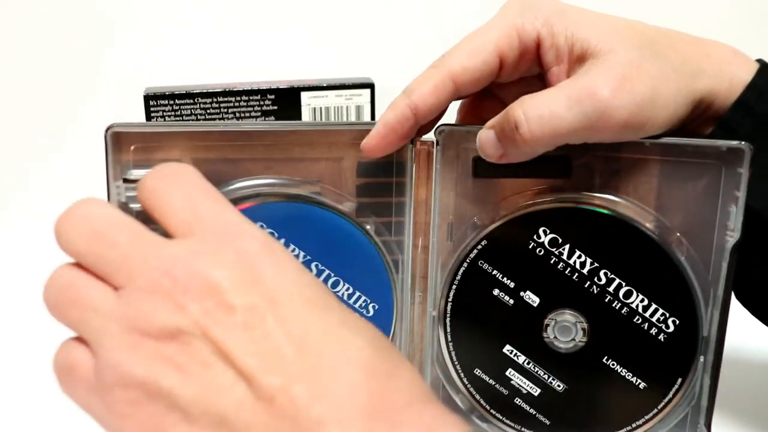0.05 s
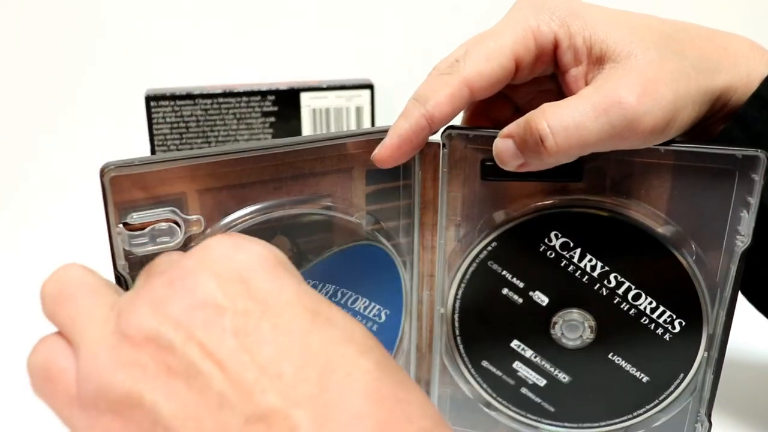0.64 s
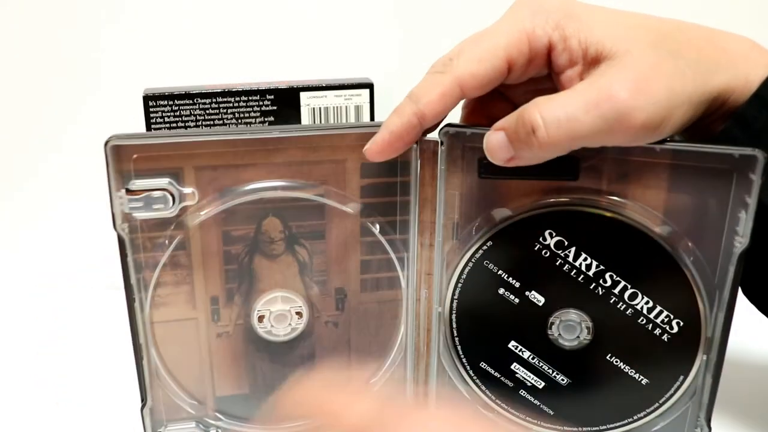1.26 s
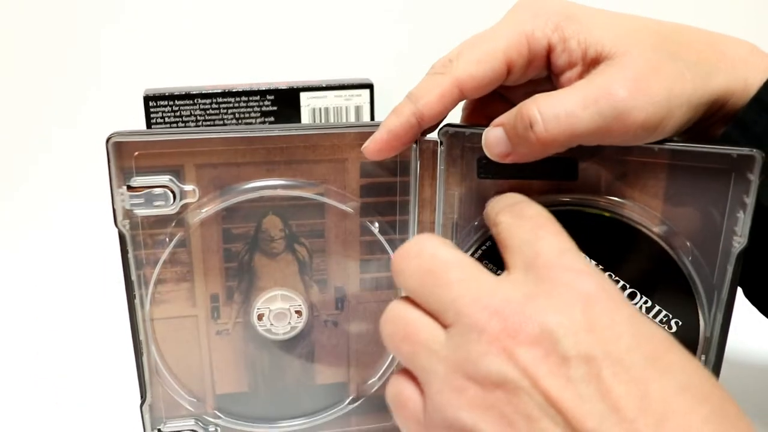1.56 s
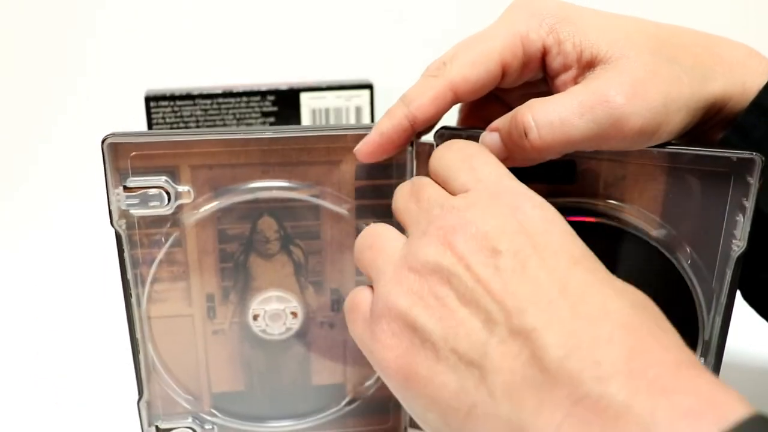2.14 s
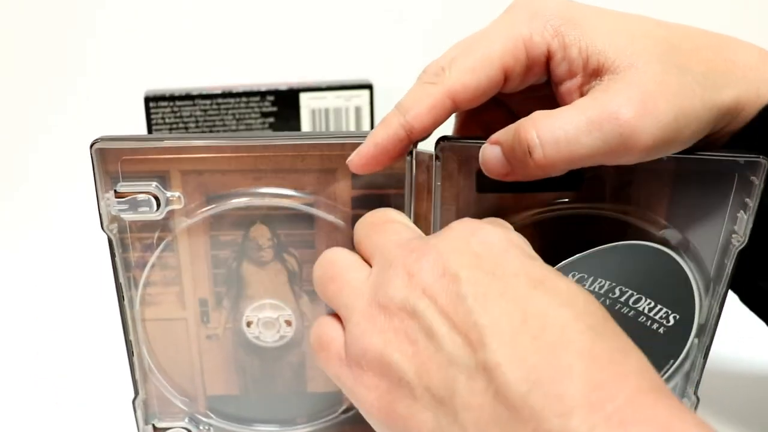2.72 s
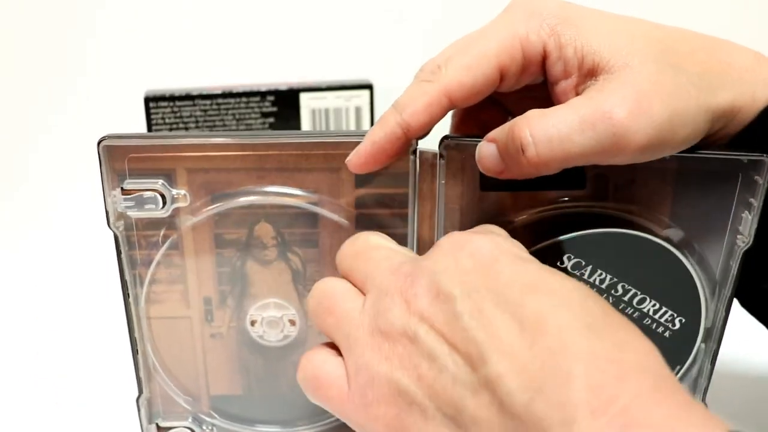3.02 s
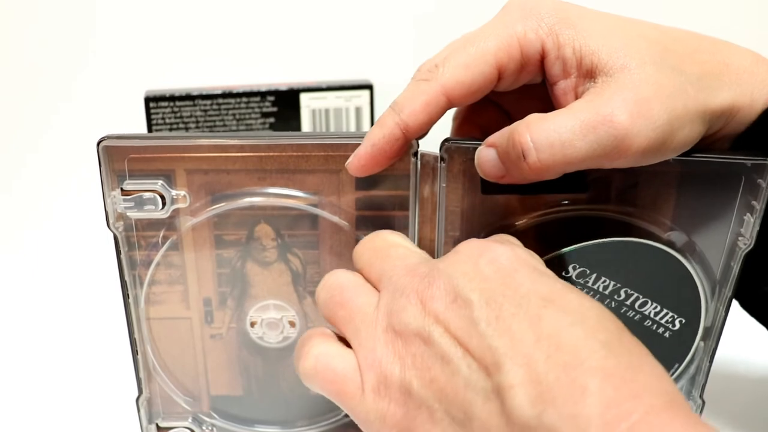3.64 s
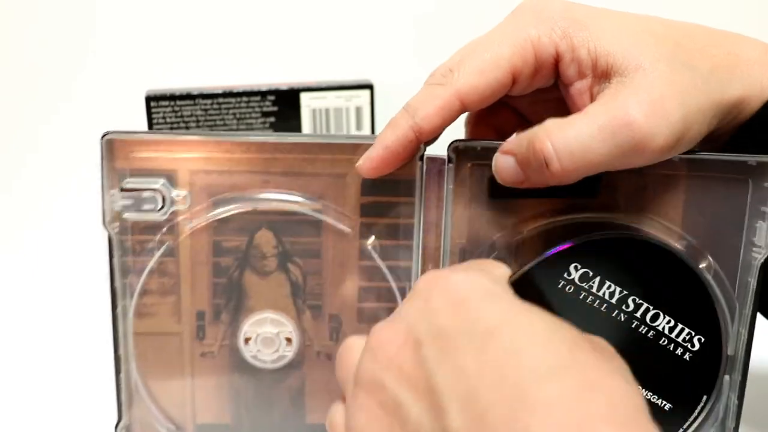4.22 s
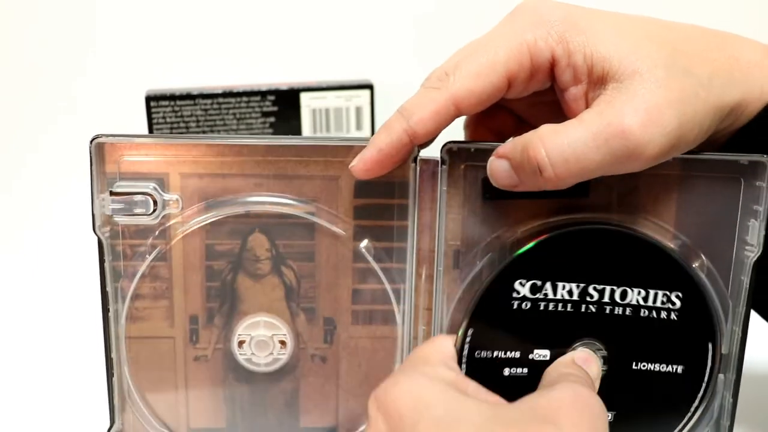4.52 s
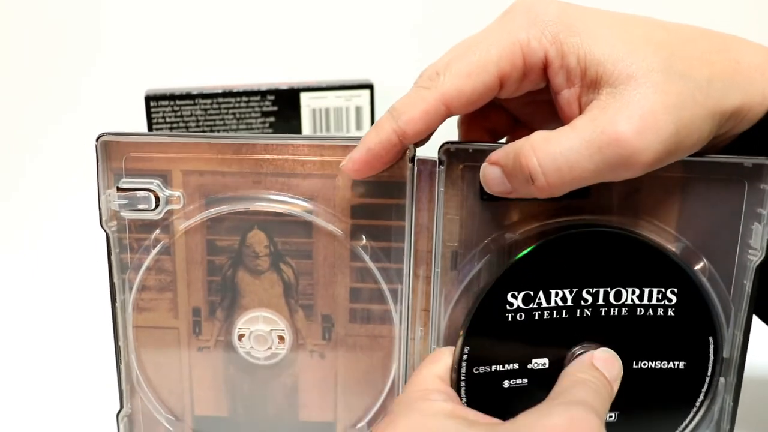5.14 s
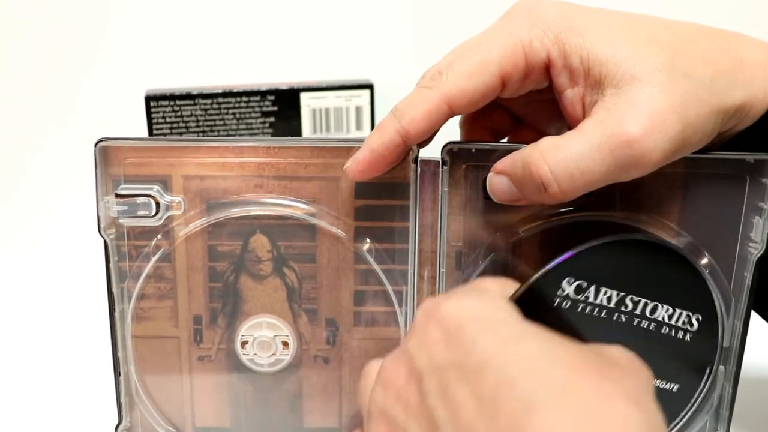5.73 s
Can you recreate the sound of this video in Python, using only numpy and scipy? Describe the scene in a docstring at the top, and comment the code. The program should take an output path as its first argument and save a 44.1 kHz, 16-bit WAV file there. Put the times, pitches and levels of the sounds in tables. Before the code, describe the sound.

Close handling of a plastic disc case: fingers rub and tap, and discs snap loose three times with loud clicks.

```python
"""Discs worked loose from a plastic tray

Close by in a small room, a hub clip lets go three times: each release cracks, the disc rings in its
damped modes and the case thumps, and the loudest peaks overload the recorder. In between, nails and
disc edges tick on the tray, skin and discs slide over it with stick-slip friction, and the case
rumbles as a disc is bent."""
import sys
import numpy as np
from scipy import signal
from scipy.fft import rfft, irfft, next_fast_len
from scipy.io import wavfile
from scipy.ndimage import uniform_filter1d, map_coordinates

SR = 44100
rng = np.random.default_rng(int(sys.argv[2]) if len(sys.argv) > 2 else 0)


def generate_wav(signal):
    """Clip the signal to [-1, 1] and save it as 16-bit WAV at the path in sys.argv[1]."""
    frames = np.transpose(np.atleast_2d(signal))
    scaled = np.clip(frames, -1, 1) * 32767
    pcm = np.round(scaled).astype(np.int16)
    wavfile.write(sys.argv[1], SR, pcm)


N = 258911
AGE = np.arange(8192) / SR  # time since a transient began [s]
HZ = np.fft.rfftfreq(8192, 1 / SR)  # frequencies of its spectrum

# hub releases: (time [s], disc ring [dB], crack [dB], crack t60 [s],
# tray knock [dB], knock frequency [Hz], thump [dB], thump frequency [Hz])
RELEASES = [(0.7571, -2, 1.5, 0.031, -18, 323, -3, 133.2), (3.8661, -2, -0.5, 0.029, -12.5, 396, -1, 140),
            (5.7315, -6.5, -6, 0.015, -18.5, 249, -28, 207)]
# spectrum of the hiss of slipping contacts: (frequency [Hz], level [dB])
HISS_SPECTRUM = [(2500, -37.5), (4200, -1.5), (6000, 3.5), (9000, 0), (12000, -6.5), (15500, -7)]


def amp(db):
    """Amplitude ratio of a level in decibels."""
    return 10 ** (np.asarray(db) / 20)


def unit(x):
    """Normalisation to rms 1."""
    return x / np.sqrt(np.mean(x ** 2) + 1e-20)


def blow(x, db):
    """Equal energy: the transient carries as much as 10 ms of steady sound at this level."""
    return unit(x) * amp(db) * np.sqrt(SR // 100 / x.shape[-1])


def fade(t60):
    """Exponential decay by 60 dB in t60 seconds."""
    return np.exp(-np.log(1000) * AGE / max(t60, .001))


def along(points, hz):
    """Interpolation of (frequency, value) points on a logarithmic frequency axis."""
    f, v = np.transpose(points)
    return np.interp(np.log(hz + 1), np.log(f), v)


def band_db(hz, centre, octaves):
    """Band-pass response: a contact excites one frequency region best."""
    return -14 * np.log10(1 + (np.log2((hz + 1) / centre) / octaves) ** 4)


def filtered(x, response):
    """Linear filtering: the spectrum is multiplied by a frequency response."""
    size = x.shape[-1]
    padded = next_fast_len(size + 8192)
    return irfft(rfft(x, padded) * response(np.fft.rfftfreq(padded, 1 / SR)), padded)[..., :size]


def coloured(x, db):
    """Minimum-phase filtering is causal: nothing sounds before the blow."""
    cepstrum = irfft(np.log(amp(db) + 1e-6))
    cepstrum[1:len(HZ) - 1] *= 2
    cepstrum[len(HZ):] = 0
    return irfft(rfft(x) * np.exp(rfft(cepstrum)))


def low_cut(x, hz):
    """Radiation efficiency: a small plate gives off little below its lowest modes."""
    return signal.sosfilt(signal.butter(2, hz, 'high', fs=SR, output='sos'), x)


def pair(size, apart):
    """Partial coherence: noise common to two microphones plus each one's own."""
    return rng.standard_normal(size) + apart * rng.standard_normal((2, size))


def wobble(rate):
    """Random modulation: a spline through rate knots a second."""
    knots = rng.standard_normal(int(N * rate / SR) + 4)
    return map_coordinates(knots, [np.arange(N) * rate / SR])


def add(track, s, x):
    """Superposition of a transient at time s."""
    start = round(s * SR)
    track[:, start:start + x.shape[-1]] += x[..., :N - start]


def gesture(start, attack, hold, t60=0.13):
    """Envelope that swells, holds and decays exponentially, as a hand's push does (times in seconds)."""
    t = np.arange(int((attack + hold + 2 * t60) * SR)) / SR
    swell = np.sin(np.pi / 2 * np.minimum(t / max(attack, .002), 1)) ** 2
    decay = np.exp(-np.log(1000) * np.maximum(t - attack - hold, 0) / t60)
    out = np.zeros((1, N))
    add(out, max(start, 0), swell * decay)
    return out[0]


def background():
    """Stationary noise: a faint, even hush, strongest in the low middle range."""
    spectrum = [(30, -26.5), (75, -25.5), (120, -14), (170, -6), (300, -9.5), (410, -3), (550, -5),
                (850, -11.5), (1500, -13.5), (3000, -46.5), (7000, -23), (15500, -34)]  # (frequency [Hz], relative level [dB])
    return amp(-58.5) * unit(filtered(pair(N, apart=0.23), lambda hz: amp(along(spectrum, hz))))


def reverberation(x):
    """Diffuse field of a small room: each frequency decays at its own rate."""
    decay_times = [(100, 0.12), (400, 0.26), (1500, 0.31), (4000, 0.29), (8000, 0.25), (15000, 0.23)]  # reverberation time: (frequency [Hz], t60 [s])
    walls = [(40, -12.5), (110, -6), (250, 0), (1000, -2), (4000, -3), (15000, -7)]  # reflected spectrum: (frequency [Hz], level [dB])
    hz, t, spectra = signal.stft(pair(SR // 2, apart=2.6), SR, nperseg=256)
    spectra = spectra * amp(-60 * t / along(decay_times, hz)[:, None])
    tail = signal.istft(spectra, SR, nperseg=256)[1]
    tail *= 1 - np.exp(-(np.arange(tail.shape[1]) / SR / 0.023) ** 2)  # reflections build up
    tail = filtered(tail / np.linalg.norm(tail[0]), lambda f: amp(along(walls, f)))
    return signal.fftconvolve(x.mean(0)[None], tail, axes=1)[:, :N]


def friction(colour_db, apart, grain_db, grain_rate, patchy_db):
    """Sliding friction: tiny slips of uneven strength, whose colour shifts as the contact moves."""
    slips = pair(N, apart) * amp(grain_db * wobble(grain_rate))
    spectra = signal.stft(slips, nperseg=512)[2]
    patches = uniform_filter1d(rng.standard_normal(spectra.shape[1:]), size=3, axis=0)
    patches = uniform_filter1d(patches, size=8, axis=1)
    slips = signal.istft(spectra * amp(patchy_db * unit(patches)), nperseg=512)[1][:, :N]
    return unit(filtered(slips, lambda hz: amp(colour_db(hz))))


def low_rumble():
    """Elastic strain: the case rumbles as a disc bends. A low rumble also dies away after each thump."""
    bends = [(0.0, 0.45, -47), (0.497, 0.76, -53), (1.897, 3.87, -55), (2.607, 2.698, -47.5),
             (5.0, 5.73, -67)]  # a hand bends a disc: (start [s], end [s], final level [dB])
    spectrum = [(15, -11), (30, -12), (70, -1.5), (120, 4.5), (220, -35)]  # (frequency [Hz], relative level [dB])
    growth_db_per_s, attack_s = 6, 0.06
    t = np.arange(N) / SR
    strain = sum(amp(db + growth_db_per_s * np.minimum(t - end, 0))
                 * gesture(start, attack_s, end - start - attack_s) for start, end, db in bends)
    thump_tail = sum(amp(thump_db - 32) * gesture(s, 0, 0, t60=0.14) for s, *_, thump_db, _ in RELEASES)
    rumble = friction(lambda hz: along(spectrum, hz), apart=.2, grain_db=1.5, grain_rate=57, patchy_db=0)
    return (strain + thump_tail) * rumble


def tray_db(hz):
    """Resonance: broad, low peaks of the tray colour the scraping."""
    resonances = [(2030, 930, -25.5), (2470, 130, -7), (2877, 120, 11.5), (3330, 53, 17), (7060, 48, -6),
                  (7730, 220, -14.5)]  # peaks: (frequency [Hz], width [Hz], weight [dB])
    min_width_hz, max_lift_db = 150, 6
    peaks = sum(amp(db / 2) / (1 + ((hz - f) / max(width, min_width_hz)) ** 2)
                for f, width, db in resonances)
    return np.minimum(4.5 * peaks, max_lift_db)


def catches(per_second, spread_db):
    """Poisson impulses: a sliding edge catches on the plastic in sparse, tiny clicks."""
    hits = (rng.random(N) < per_second / SR) * amp(spread_db * rng.standard_normal(N))
    click = coloured(pair(len(AGE), apart=0.5) * fade(0.009), band_db(HZ, 4800, 1.2))
    return unit(signal.fftconvolve(hits[None], click, axes=1)[:, :N])


def stroke_gains():
    """Amplitude envelopes of friction: strokes add to fingers that never lie quite still."""
    # skin or disc passes over the tray, in relative levels:
    # (start [s], attack [s], hold [s], handling [dB], scrape [dB], hiss [dB])
    strokes = [(0.072, 0.077, 0.064, -42.5, -32.5, -40.5), (0.235, 0.026, 0.16, -36, -37, -41),
               (0.832, 0.06, 0.031, -35.5, -35.5, -45), (0.911, 0.072, 0.03, -39, -34, -30),
               (1.139, 0.016, 0.046, -30, -32.5, -39.5), (1.21, 0.052, 0.017, -45, -41.5, -31),
               (1.33, 0.023, 0.011, -41.5, -54, -66), (1.653, 0.02, 0.059, -44, -45, -55),
               (1.891, 0.021, 0.011, -38, -42, -62), (2.031, 0.055, 0.014, -35.5, -40, -66.5),
               (2.15, 0.024, 0.086, -44.5, -53.5, -64), (2.32, 0.0079, 0.0047, -39, -36.5, -40.5),
               (2.386, 0.013, 0.0092, -41, -42, -38.5), (2.476, 0.026, 0.01, -40, -40, -62),
               (2.501, 0.057, 0.038, -53, -38, -37), (2.645, 0.028, 0.01, -34, -36.5, -37),
               (2.757, 0.0063, 0.049, -48, -42.5, -59), (2.9, 0.024, 0.007, -28.5, -31.5, -31.5),
               (3.233, 0.013, 0.011, -36, -57, -57), (3.408, 0.0075, 0.011, -41.5, -42.5, -52),
               (3.534, 0.01, 0.0062, -30.5, -44, -44.5), (3.584, 0.0077, 0.17, -50, -52, -55),
               (3.925, 0.078, 0.028, -39, -35, -42.5), (4.022, 0.026, 0.16, -53, -35.5, -36),
               (4.258, 0.017, 0.003, -58, -40, -31.5), (4.3, 0.029, 0.0095, -40, -41.5, -46),
               (4.403, 0.0074, 0.19, -49, -52, -56), (4.536, 0.017, 0.022, -43.5, -36, -39),
               (4.685, 0.0096, 0.015, -34, -34.5, -34), (4.72, 0.014, 0.039, -49, -45, -53),
               (4.881, 0.047, 0.04, -43, -50, -57.5), (5.08, 0.033, 0.012, -30.5, -29.5, -33),
               (5.203, 0.039, 0.023, -34, -35.5, -33), (5.366, 0.0073, 0.0095, -34, -42, -45),
               (5.501, 0.0084, 0.0043, -42, -56, -63), (5.714, 0.008, 0.11, -34.5, -37, -53)]
    resting = (-57, -54, -58.5)  # fingers at rest: (handling [dB], scrape [dB], hiss [dB])
    gains = amp(np.array(resting)[:, None] - 2.5 * wobble(rate=8))
    for start, attack, hold, handling_db, scrape_db, hiss_db in strokes:
        push = gesture(start, attack, hold)
        hiss_push = gesture(start, attack, hold, t60=0.077)  # the hiss dies first
        gains += [amp(handling_db) * push, amp(scrape_db) * push, amp(hiss_db) * hiss_push]
    return gains


def rubbing():
    """Friction noise: gripping fingers rumble in the case; skin and discs scrape and hiss on the tray."""
    handling_spectrum = [(40, -43.5), (75, -29), (115, -6.5), (180, 1.5), (270, -1), (410, 1.5),
                         (600, -10.5), (900, -8), (1500, -39.5)]  # fingers on the case: (frequency [Hz], level [dB])
    scrape_spectrum = [(300, -38), (700, -2), (1200, 0), (2000, 0.5), (3100, -4.5), (4300, -2.5),
                       (6000, -8.5), (8500, -47.5)]  # sliding on the tray: (frequency [Hz], level [dB])
    handling, scrape, hiss = stroke_gains()
    rumble = low_rumble()
    body = handling * friction(lambda hz: along(handling_spectrum, hz),
                               apart=0.3, grain_db=3.5, grain_rate=110, patchy_db=5.5)
    slide = scrape * friction(lambda hz: along(scrape_spectrum, hz) + tray_db(hz),
                              apart=0.96, grain_db=3.0, grain_rate=1100, patchy_db=2.6)
    sheen = hiss * friction(lambda hz: along(HISS_SPECTRUM, hz),
                            apart=1.0, grain_db=2.0, grain_rate=1100, patchy_db=1.6)
    grit = np.sqrt(handling * scrape) * catches(per_second=20, spread_db=6)  # needs pressure and motion
    surface = amp(-4.5) * slide + amp(-5) * sheen + amp(-15) * grit
    return rumble + amp(-4.5) * body + surface * amp([[-1], [1]])


def scuffs():
    """Stick-slip motion: a dragged nail or disc edge swells, chatters and stirs the case."""
    drags = [(0.268, 0.0048, -29.5, 2050), (0.945, 0.01, -36, 2080), (1.002, 0.019, -32.5, 4130),
             (1.231, 0.0096, -35.5, 2000), (1.269, 0.014, -32.5, 4270), (1.286, 0.0087, -36.5, 2180),
             (2.406, 0.008, -27.5, 3210), (2.579, 0.037, -37, 3220), (2.675, 0.01, -34, 2980),
             (2.929, 0.013, -41, 3240), (3.553, 0.0056, -39.5, 2220), (4.179, 0.032, -40, 3320),
             (4.278, 0.0083, -29, 2680), (4.53, 0.0096, -35, 1930), (4.555, 0.0044, -28.5, 1730),
             (5.244, 0.0093, -41, 2890)]  # (peak time [s], half length [s], relative level [dB], frequency [Hz])
    out = np.zeros((2, N))
    middle = AGE[-1] / 2
    chatter = unit(1 + .5 * np.tanh(wobble(700)))
    for s, half, db, hz in drags:
        octaves = 0.46 * (0.0094 / half) ** 0.58  # a longer drag settles on a narrower band
        case_db = db - 12.5 - 13.5 * np.log2(hz / 2700)  # a lower drag stirs the case more
        drag = unit(filtered(pair(len(AGE), apart=0.16), lambda f: amp(band_db(f, hz, octaves))))
        case = unit(filtered(pair(len(AGE), apart=0.08), lambda f: amp(band_db(f, 560, 0.52))))
        swell = np.exp(-((AGE - middle) / half) ** 2 / 2)
        add(out, s - middle, swell * (amp(db) * drag * amp([[-2.5], [.5]]) + amp(case_db) * case))
    return out * chatter


def case_ring(low_hz, high_hz, centre_hz):
    """Modal vibration of the case: the place of the blow favours the modes near one pitch."""
    modes = [(120, -1, 0.4), (168, 7, 0.051), (274, 9, 0.025), (360, 3, 0.0043), (418, -2, 0.055),
             (532, -7, 0.076), (634.5, 3.5, 0.019), (728, -7.5, 0.19), (961, 16, 0.013)]  # case modes: (frequency [Hz], level [dB], t60 before the cap [s])
    max_t60_s = 0.1  # the case rings only briefly, a dull knock
    ring = np.zeros(len(AGE))
    for k, (hz, db, t60) in enumerate(modes):
        if low_hz <= hz < high_hz:
            gain = (-1) ** k * amp(db + band_db(hz, centre_hz, 0.32) + 2 * rng.normal())
            detuned_hz = hz * (1 + 0.044 * rng.normal())
            ring += gain * fade(min(t60, max_t60_s)) * np.sin(2 * np.pi * detuned_hz * AGE)
    return low_cut(ring, centre_hz * .6)


def contact(thud_db, knock_db, snap_db, fizz_db, snap_hz):
    """Impact excitation: a short burst of slips snaps in the tray and sets the case ringing."""
    flex_hz = 300  # below this the case flexes as a whole, above it its panels knock
    slips = pair(len(AGE), apart=0.4) * fade(0.041) * (1 + 2 * fade(0.013))
    crack = unit(coloured(slips, band_db(HZ, snap_hz, 1.0)))
    spot = unit(np.sin(2 * np.pi * snap_hz * AGE) * fade(0.022))  # the struck spot rings briefly
    snap = blow(crack + 0.4 * spot, snap_db)
    fizz = blow(coloured(slips, along(HISS_SPECTRUM, HZ)), fizz_db)
    thud = blow(case_ring(0, flex_hz, centre_hz=165), thud_db)
    knock_hz = 472 * 2 ** ((knock_db + 34.5) / 77)  # a harder knock reaches higher modes
    knock = blow(case_ring(flex_hz, SR, knock_hz), knock_db)
    return thud + knock + (snap + fizz) * amp([[-1.5], [1.5]])


def ticks():
    """Light impacts: nails and disc edges tap the tray, with fainter touches at random moments."""
    # taps on the tray: (time [s], thud [dB], knock [dB], snap [dB], fizz [dB], snap frequency [Hz])
    taps = [(0.0724, -25, -28, -35, -58, 2760), (0.1078, -31, -39, -26.5, -38, 3410),
            (0.1929, -50, -28, -32, -40.5, 2740), (0.2986, -25, -37, -38.5, -53, 2640),
            (0.4108, -39, -34, -57, -54, 2700), (0.4665, -41, -37.5, -46.5, -66, 1810),
            (0.6393, -39.5, -33, -30, -36.5, 1390), (0.714, -60, -56, -39, -52, 2440),
            (0.8929, -17, -30, -33.5, -58, 2720), (0.8965, -20, -52, -54, -35, 3000),
            (1.1458, -53, -18, -21, -24.5, 2410), (1.1591, -54, -24, -23.5, -60, 2540),
            (1.198, -57, -36, -36, -38, 2060), (1.3743, -60, -56, -41, -64, 3820),
            (1.582, -66, -46, -44.5, -46.5, 2230), (1.6862, -50, -33, -26, -32, 2980),
            (1.73, -65, -34, -35.5, -61, 2210), (1.7449, -65, -37.5, -40.5, -44, 2320),
            (1.8826, -40, -35, -33, -56, 2700), (1.9045, -58, -48, -28.5, -33, 3430),
            (2.0979, -54, -33.5, -27.5, -31, 3810), (2.1225, -59, -40.5, -36, -55, 3220),
            (2.2071, -43, -30.5, -30, -41, 2640), (2.4695, -50, -47, -37, -42.5, 2870),
            (2.8189, -48, -50, -49, -61, 1740), (2.8402, -49, -51, -44, -55, 2160),
            (2.9569, -38, -40.5, -41, -60, 3420), (2.977, -48, -60, -41.5, -58, 2600),
            (3.079, -44.5, -47.5, -40.5, -53, 2900), (3.2433, -33, -39, -38, -42, 2680),
            (3.299, -47, -70, -32.5, -60, 2860), (3.4121, -52, -37, -36, -40, 3400),
            (3.4223, -41.5, -39, -31.5, -38, 3600), (3.986, -54, -33.5, -33, -38, 2200),
            (4.0231, -61, -43, -30, -34, 3450), (4.1018, -61, -37, -22, -37, 2040),
            (4.293, -50, -32, -51, -60, 1400), (4.55, -58, -34, -29, -37, 1730),
            (4.5704, -55, -34, -18.5, -22, 2050), (5.1064, -65, -39, -27, -39, 2750),
            (5.3699, -44, -39, -45, -51, 2100), (5.738, -28.5, -34, -38, -55, 2000),
            (5.756, -31.5, -46, -31, -55, 2000)]
    out = np.zeros((2, N))
    for s, *tap in taps:
        add(out, s, contact(*tap))
    for s in rng.uniform(0, (N - 1) / SR, size=32):
        db = -52 + 3.5 * rng.normal()
        add(out, s, contact(thud_db=db - 6.5, knock_db=db, snap_db=db, fizz_db=db - 5, snap_hz=2600))
    return out


def disc_ring(modes, grip_hz, apart):
    """Damped free vibration of a released disc: the fingers widen every mode by grip_hz."""
    ring = np.zeros((2, len(AGE)))
    for hz, width, db in modes:
        phase = rng.uniform(0, 2 * np.pi) + apart * rng.standard_normal((2, 1))
        decay = np.exp(-np.pi * (width / 2 + grip_hz) * AGE)
        ring += amp(db) * decay * np.sin(2 * np.pi * hz * AGE + phase)
    return ring


def hub_releases():
    """Release of elastic energy: the clip snaps past the rim, the disc rings, the tray springs back."""
    # disc modes at each release: (frequency [Hz], twice the free bandwidth [Hz], level [dB])
    first_disc = [(558, 220, 11.5), (1110, 56, 8.5), (1385, 27, 14.5), (1613, 17, -1.5), (1650, 30, -1),
                  (1898, 50, -17.5), (2640, 57, 5.5), (2720, 48, 14), (3220, 88, 0), (3410, 140, -19.5),
                  (3830, 170, 7), (4420, 24, -11), (5160, 54, 8), (5100, 24, -16)]
    second_disc = [(1166, 170, 8), (1390, 52, -8), (1890, 69, 8.5), (2790, 13, -18), (3008, 24, 14),
                   (3440, 130, 18.5), (3810, 180, 13.5), (4360, 37, -10), (4970, 22, 8.5), (4640, 290, -34),
                   (5560, 31, -10), (5650, 67, -20), (7030, 17, 3), (6260, 28, -40.5)]
    third_disc = [(492, 140, 6.5), (1270, 46, -3.5), (1646, 85, 2.5), (2000, 15, -13), (2060, 57, -1.5),
                  (2450, 49, -14), (2680, 200, 12.5), (3455, 220, 7), (3670, 110, 3), (3950, 15, -21),
                  (4500, 190, -6)]
    crack_spectrum = [(200, -47), (450, -0.5), (750, 1.5), (1500, 3), (3000, 3), (5000, -3), (7000, -0.5),
                      (10000, -7), (15500, -14.5)]
    crack_colour = along(crack_spectrum, HZ)
    direct, to_walls = np.zeros((2, 2, N))
    for release, disc in zip(RELEASES, (first_disc, second_disc, third_disc)):
        s, ring_db, crack_db, t60, knock_db, knock_hz, thump_db, thump_hz = release
        ring = blow(low_cut(disc_ring(disc, grip_hz=56.7, apart=0.46), hz=200), ring_db)
        crack = blow(coloured(pair(len(AGE), apart=0.74) * fade(t60), crack_colour), crack_db)
        rebound = np.sin(2 * np.pi * knock_hz * AGE) * fade(0.028)
        knock = blow(low_cut(rebound, hz=157), knock_db) * amp([[2], [-2]])
        # the flexing case pushes air unevenly at the two microphones
        push = np.sin(2 * np.pi * thump_hz * AGE + np.array([[1.5], [0]])) * fade(0.012)
        thump = blow(low_cut(push, hz=51), thump_db) * amp([[-4], [2.5]])
        add(direct, s, ring + crack + knock + thump)
        # the room gathers every direction of radiation, so the crack's notches even out
        even_crack = blow(coloured(1. * (AGE == 0), crack_colour), (crack_db + ring_db) / 2)
        add(to_walls, s, even_crack + knock + amp(-10) * thump)
    return direct, to_walls


def scene():
    """Superposition of the direct sound, the room's reverberation and the quiet background."""
    releases, cracks = hub_releases()
    taps = ticks()
    rubs = rubbing() + scuffs()
    delay_s = np.array([[1], [-1]]) / SR  # the tray lies a little nearer the right microphone
    direct = filtered(releases + taps + rubs, lambda hz: np.exp(-2j * np.pi * hz * delay_s))
    diffuse = reverberation(amp(-20) * taps + amp(-13.5) * rubs) + reverberation(amp(-15.5) * cracks)
    return direct + diffuse + background()


def record(dry):
    """Saturation and band limiting: the recorder clips the cracks and cuts off the highest treble."""
    ceiling, top_hz = .97, 15800
    clipped = dry / (1 + np.abs(dry / ceiling) ** 8) ** (1 / 8)
    return filtered(clipped, lambda hz: 1 / (1 + (hz / top_hz) ** 120))


dry = scene()
out = record(dry)
generate_wav(out)
```